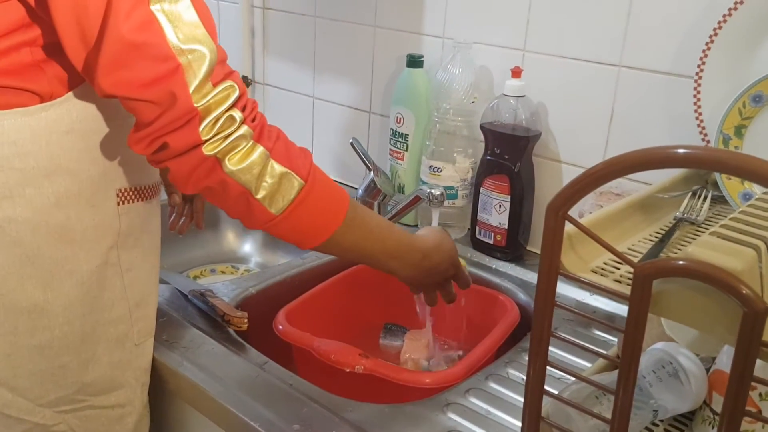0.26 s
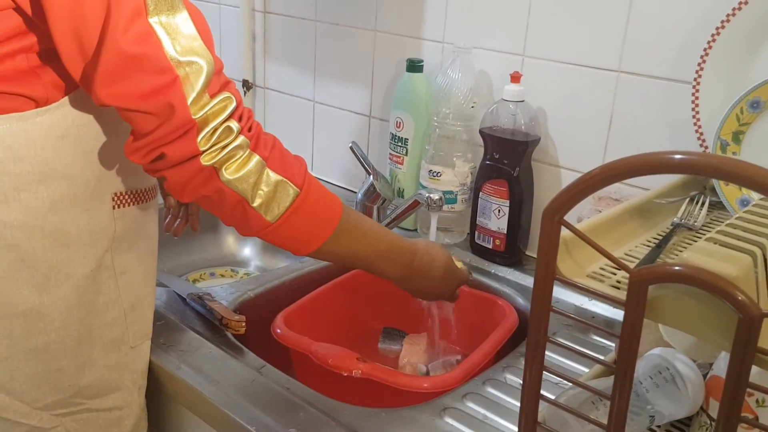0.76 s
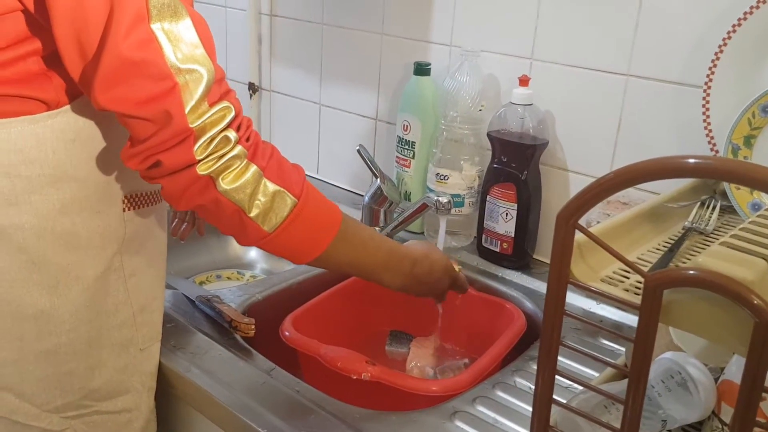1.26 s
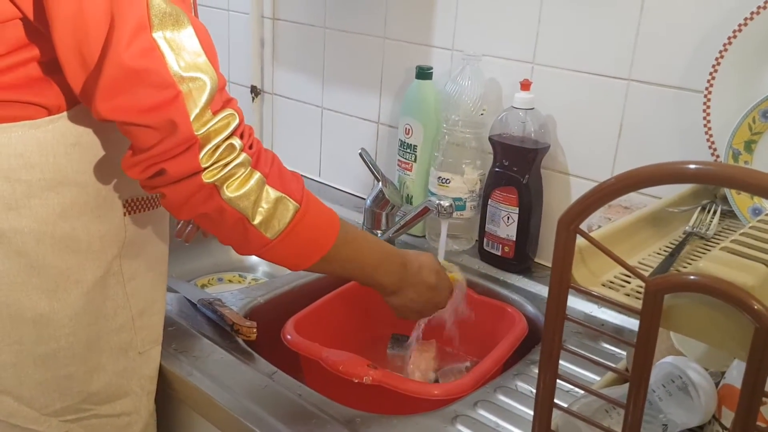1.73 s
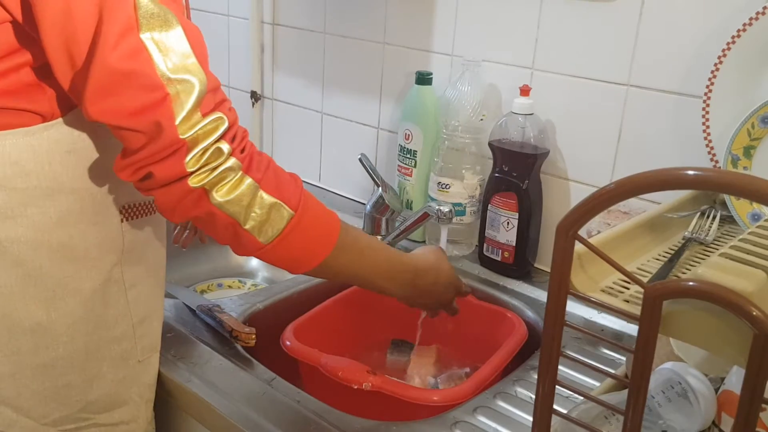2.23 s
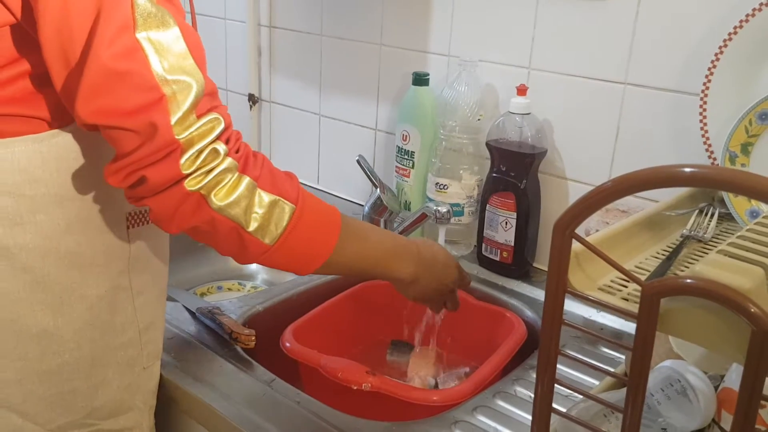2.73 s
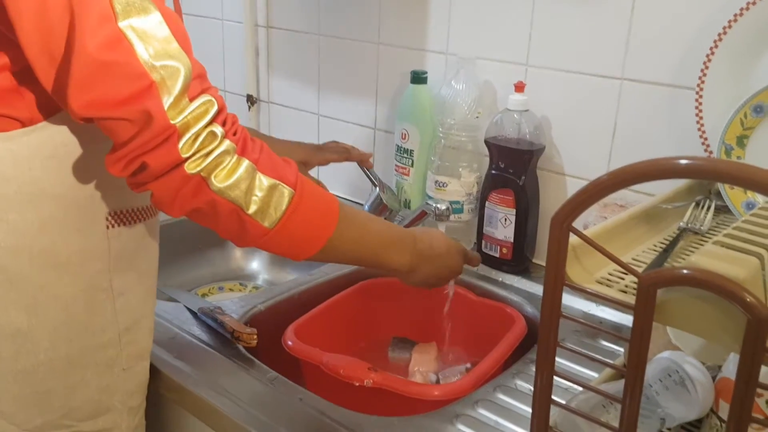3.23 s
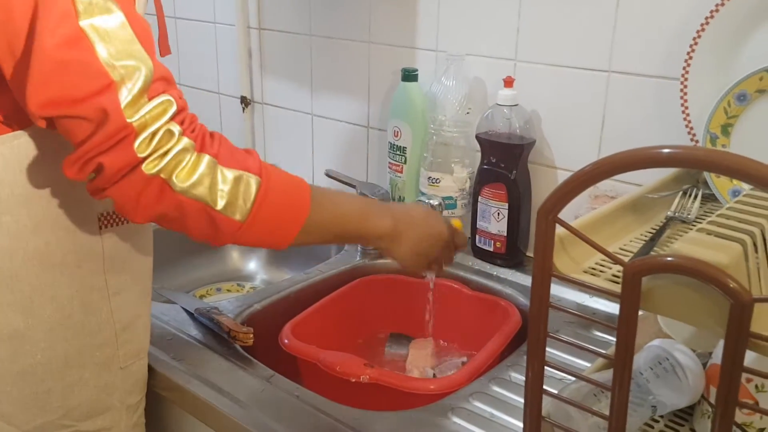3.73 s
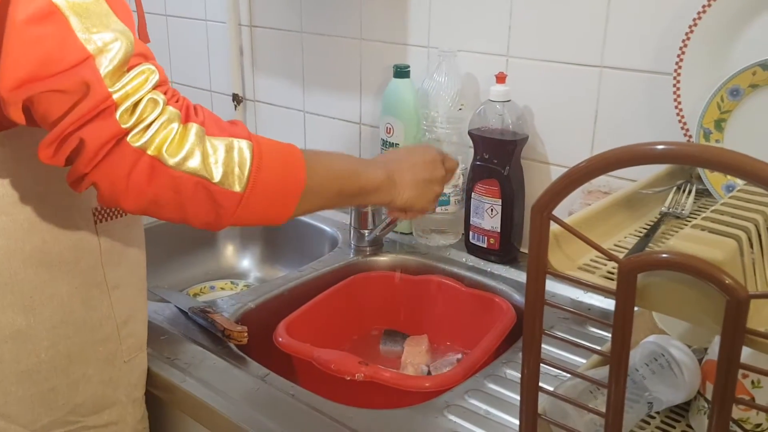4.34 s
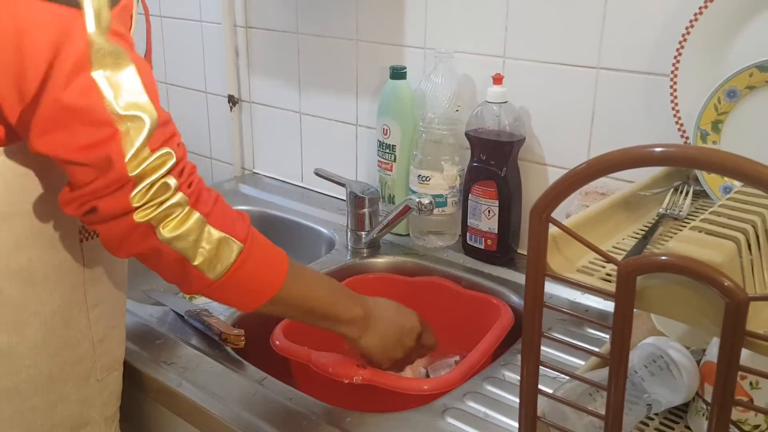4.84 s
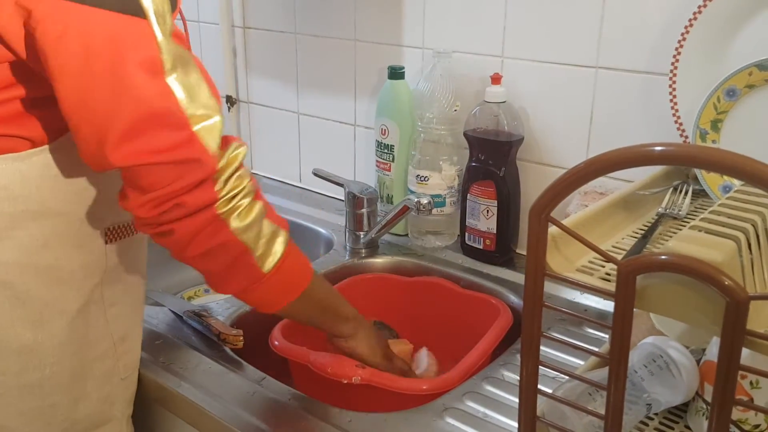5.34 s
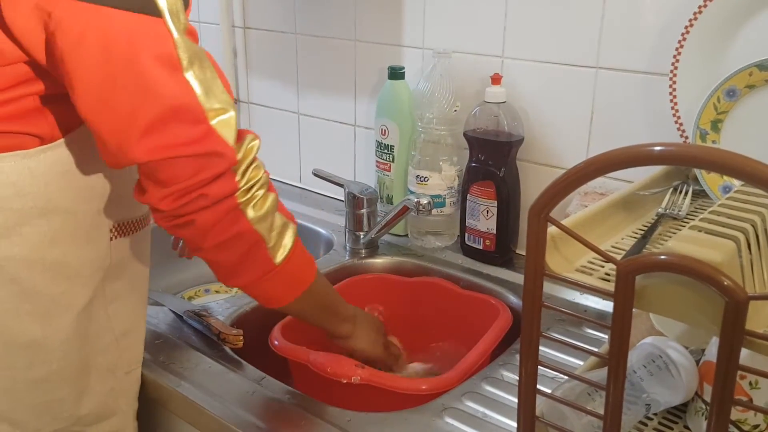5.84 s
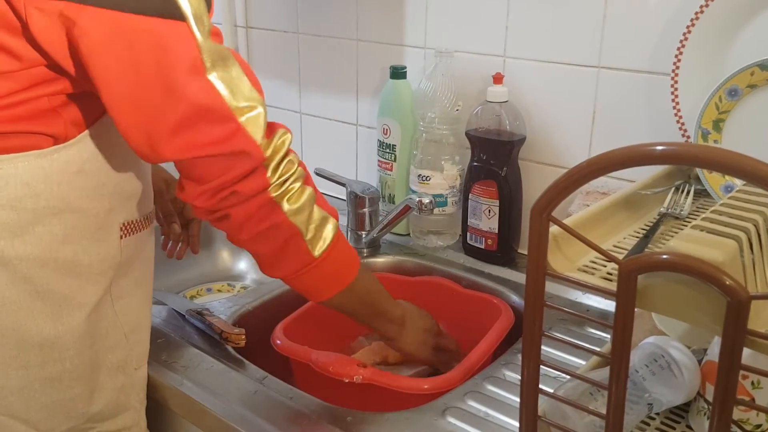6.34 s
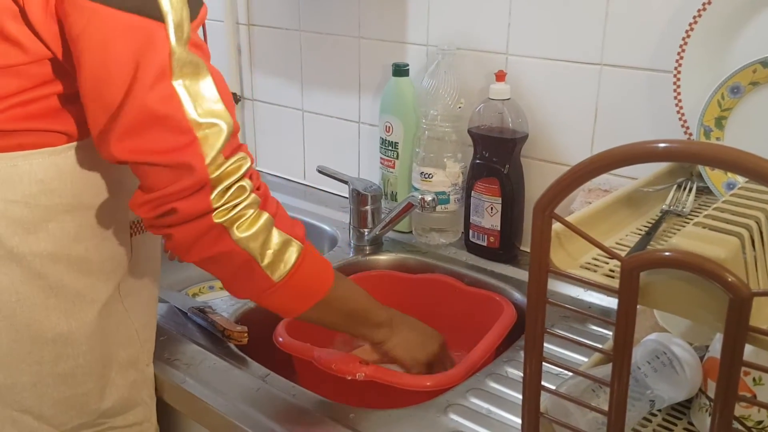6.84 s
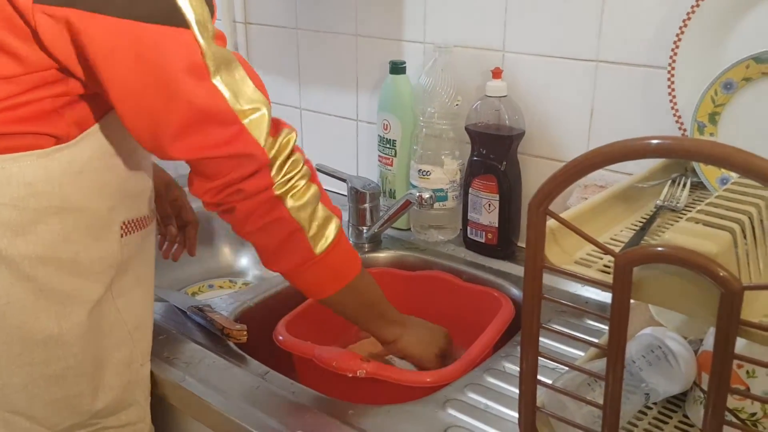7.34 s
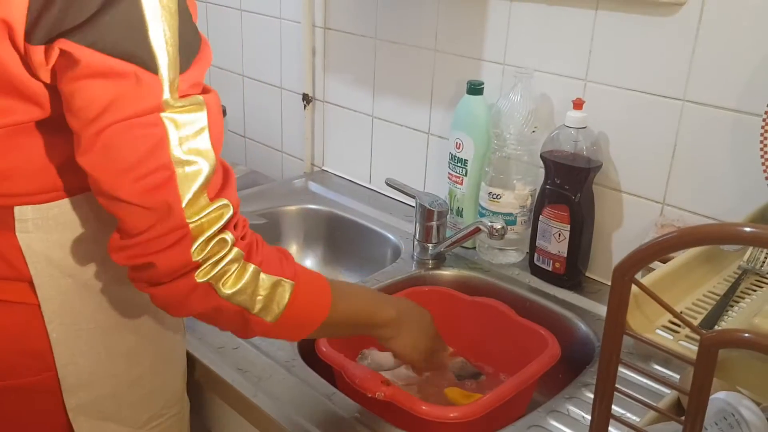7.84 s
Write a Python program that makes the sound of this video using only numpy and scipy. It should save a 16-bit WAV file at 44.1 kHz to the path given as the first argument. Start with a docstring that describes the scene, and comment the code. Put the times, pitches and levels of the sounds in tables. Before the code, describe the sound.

Close in a small tiled kitchen, a tap hisses brightly and patters into a plastic basin, with occasional hollow knocks against the steel sink. About three and a half seconds in, the tap shuts with a clunk and the water quickly stops. A hand then sloshes fish in shallow water, with bubbles, squirts and bumps, over a faint low motor hum.

```python
"""Tap, fish and basin in a steel sink

A kitchen tap hisses over a hand and some fish into a plastic basin in a steel sink, in a small tiled room.
Filtered noise and random impacts make the jet and its patter; resonant modes make the sink boom under the
basin's knocks and scrapes. The tap is shut, water runs off, and the hand sloshes the fish about in shallow
water: swarms of decaying sines are the bubbles, short noise bursts the splashes and squirts.
"""
import sys
import numpy as np
from scipy import signal
from scipy.fft import rfft, irfft, next_fast_len
from scipy.io import wavfile

SR = 44100
rng = np.random.default_rng(int(sys.argv[2]) if len(sys.argv) > 2 else 0)


def put_to_file(sound):
    """Save the sound as 16-bit audio at rate SR, in the file named by the first command-line argument."""
    columns = np.atleast_2d(sound).T  # one column per channel
    safe = np.clip(columns, -1, 1)
    whole_steps = np.round(safe * 32767)
    wavfile.write(sys.argv[1], SR, whole_steps.astype(np.int16))


N = 356261
TIME = np.arange(N) / SR
SHORT = TIME[:SR * 4 // 5]  # time axis of a single event, 0.8 s

# Bubbles that stand out singly, low and high, each with a small splash.
# Each row: start in seconds, relative level in dB, starting pitch in Hz.
BUBBLE_EVENTS = [(2.813, -31.5, 6950), (4.111, -55, 2360), (5.269, -47.5, 1047), (5.496, -42.5, 2275),
                 (5.64, -41.5, 1980), (5.864, -37, 1174), (5.92, -38, 3150), (6.044, -41.5, 976),
                 (6.226, -38.5, 1430), (6.255, -39, 630), (6.447, -42, 1430), (7.055, -19.5, 650),
                 (7.547, -25, 2320), (7.919, -41.5, 1770), (8.013, -50, 4140)]


def undb(db):
    """Decibels to amplitude gain: 20 dB is a factor of ten."""
    return 10 ** (np.asarray(db) / 20)


def unit(x):
    """Normalise the power: scale to rms 1."""
    return x / np.sqrt(np.mean(x ** 2) + 1e-20)


def fade(t, t60):
    """Exponential damping that loses 60 dB in t60 seconds."""
    return np.exp(-np.log(1000) * t / np.maximum(t60, 1e-3))


def swell(t, rise_s):
    """A rounded attack: exponential approach to full amplitude."""
    return 1 - np.exp(-t / rise_s)


def lookup(points, hz):
    """Interpolate (Hz, value) points on a logarithmic frequency axis."""
    f, value = np.transpose(points)
    return np.interp(np.log(hz + 0.0014), np.log(f), value)


def bins(x):
    """Frequencies of the discrete spectrum of x, in Hz."""
    return np.fft.rfftfreq(next_fast_len(x.shape[-1]), 1 / SR)


def shape(x, gain):
    """Linear filtering: multiply the spectrum by one gain for each frequency."""
    size = next_fast_len(x.shape[-1])
    return irfft(rfft(x, size) * gain, size)[..., :x.shape[-1]]


def colour(x, points):
    """Spectral shaping by (Hz, dB) points, with a roll-off below the first; rms 1."""
    f = bins(x)
    roll_off = np.minimum(f / points[0][0], 1) ** 2
    return unit(shape(x, undb(lookup(points, f)) * roll_off))


def add(track, s, sound):
    """Superposition: mix a sound into a track at time s."""
    start = min(max(int(s * SR), 0), N - 1)
    track[..., start:start + sound.shape[-1]] += sound[..., :N - start]


def waver(rate_hz):
    """Slow random modulation: low-passed noise with spread 1."""
    points = [(rate_hz / 10, 0), (rate_hz, -3), (rate_hz * 2, -20), (rate_hz * 20, -120)]
    return colour(rng.standard_normal(N), points)


def clicks(rate, scatter_db, size=N):
    """Shot noise: tiny random impacts at a mean rate per second, a few much stronger than the rest."""
    strength = undb(max(scatter_db, 0) * np.minimum(rng.exponential(size=size), 5))
    struck = rng.random(size) < rate / SR
    return unit(struck * strength * rng.choice([-1, 1], size))


def gestures(table, rise, fall, settle=1.43):
    """Amplitude envelope of hand movements: each gathers smoothly to its peak, then dies away ever faster."""
    power = np.zeros(N)
    for s, db, length in table:
        t = (TIME - s) / length
        loss = np.where(t < 0, (t / rise) ** 2, np.abs(t / fall) ** settle)
        power += (undb(db) * np.exp(-np.minimum(loss, 20))) ** 2
    return np.sqrt(power)


def room(x, wet_db, wide_hz=600, wander_hz=9, count=4):
    """Reverberation of tiled walls: both channels share the bass but each has its own treble."""
    # Each row: frequency in Hz, reverberation time in seconds.
    room_t60 = [(100, 0.49), (500, 0.35), (2500, 0.31), (6000, 0.27), (15000, 0.22)]
    f = bins(SHORT)
    apart = np.minimum(f / wide_hz, 1)
    centres = np.geomspace(60, 16000, 7)
    wet = 0
    for k in range(count):
        mid, side = rng.standard_normal((2, len(SHORT)))
        common = shape(mid, np.sqrt(1 - apart ** 2 / 2))
        noise = common + shape(side, apart / np.sqrt(2)) * np.array([[1], [-1]])
        tail = 0
        for hz, pick in zip(centres, np.eye(len(centres))):
            band = shape(noise, lookup(np.c_[centres, pick], f))  # overlapping bands that sum to one
            tail = tail + band * fade(SHORT, lookup(room_t60, hz))
        response = unit(tail * swell(SHORT, rise_s=0.00022))
        # the source wanders between spots, each with its own pattern of reflections; at 0 Hz it stays put
        phase = 2 * np.pi * wander_hz * (1 + k // 2) * TIME + k * np.pi / 2
        share = np.sqrt(2 / count) * np.cos(phase)
        wet = wet + signal.oaconvolve((x * share)[None], response, axes=1)[:, :N]
    return (x + undb(wet_db) * wet / np.sqrt(len(SHORT))) / np.hypot(1, undb(wet_db))


def kitchen():
    """Ambient noise, coherent between channels in the bass, and a motor's low tones with drifting phase."""
    # A motor humming in the kitchen. Each row: frequency in Hz, rms level in dB.
    hum_tones = [(59.2, -54), (113.0, -57.5), (172.3, -62)]
    # Spectrum of the background noise: strong bass, almost nothing near 3500 Hz, faint hiss above.
    # Each row: frequency in Hz, relative level in dB.
    background_colour = [(25, -7), (55, 7.5), (125, -3.5), (300, -13.5), (550, -20.5), (1200, -37.5),
                         (3500, -75), (8000, -38.5), (15000, -46)]
    hum = 0
    for hz, db in hum_tones:
        phase = 2 * np.pi * hz * TIME + 0.38 * waver(rate_hz=1.2)
        hum = hum + np.sqrt(2) * undb(db) * np.sin(phase)
    mid, side = colour(rng.standard_normal((2, N)), background_colour)
    side = shape(side, np.minimum(bins(side) / 500, 1))
    background_db = -54
    return hum + undb(background_db) * (mid + side * np.array([[1], [-1]]))


def radiate(x):
    """Radiation cut-off: the sink is too small to radiate below its lowest mode."""
    return signal.sosfilt(signal.butter(6, 55, "high", fs=SR, output="sos"), x)


def boom(centre_hz, focus_db, ring, rise_s=0.0011, apart=0.26):
    """Modal synthesis: one push rings the sink, and the contact point favours modes near some centre."""
    # Modes of the loaded sink. Each row: frequency in Hz, relative level in dB,
    # 60 dB decay time in seconds before scaling by ring.
    sink_modes = [(60.5, -0.5, 0.9), (74.8, 2.5, 0.42), (128.4, 4.5, 0.26), (146.6, 2, 0.39),
                  (177.7, 1.5, 0.28), (196.2, -10.5, 0.38), (226.7, 2, 0.33), (259.5, 0, 0.5),
                  (286.6, 0.5, 0.37), (334.8, -4.5, 0.25), (350.2, -5.5, 0.25), (382, -6.5, 0.29),
                  (463.5, -13, 0.29), (546, -12.5, 0.17), (608, -5.5, 0.17), (824, -13.5, 0.26),
                  (874, -8.5, 0.14), (954, -17, 0.19)]
    hz, db, t60 = np.transpose(sink_modes)[:, :, None]
    load, spot, phase, path = rng.uniform(-1.085, 1, (4, len(sink_modes), 1))
    off_centre_db = np.minimum(focus_db * np.log2(hz / centre_hz) ** 2, 26)
    weight = undb(db + 2.6 * spot - off_centre_db)
    t = SHORT[:SR // 3]
    # the shifting water detunes the modes a little from blow to blow
    turns = hz * (1 + 0.01 * load) * t + phase / 2
    modes = weight * np.exp(2j * np.pi * turns) * fade(t, t60 * ring)
    # standing waves put the higher modes out of step in the two channels
    shift = apart * np.sign(path) * np.minimum(hz / 140, 1) ** 3
    channels = np.exp(1j * shift * np.array([1, -1]))
    out = (channels.T @ modes).imag * swell(t, rise_s)
    return out / out[:, :SR // 20].std()


def rumble(rate, centre_hz, focus_db, ring):
    """Sustained modal excitation: many small pushes of uneven strength keep the sink ringing."""
    pushes = clicks(rate, scatter_db=3)
    ringing = signal.oaconvolve(pushes[None], boom(centre_hz, focus_db, ring), axes=1)[:, :N]
    return unit(radiate(ringing))


def crack(edge_hz, t60=0.054, treble_floor=0.078, snap_db=-4.0, snap_t60=0.0091):
    """Impact spectrum: hard plastic snaps on steel and chatters; a softer contact has less treble."""
    # Spectrum of the chatter. Each row: frequency in Hz, relative level in dB.
    crack_colour = [(80, -21), (200, 18), (450, 15), (680, 0.5), (860, 12), (1300, -2), (2000, 3.5),
                    (2600, 5), (3200, -1), (5000, 0), (8000, -17), (15000, -33)]
    t = SHORT[:SR // 5]
    chatter = colour(clicks(rate=6000, scatter_db=0, size=len(t)), crack_colour)
    low_pass = treble_floor + 1 / np.hypot(1, (bins(chatter) / edge_hz) ** 1.47)
    out = shape(chatter, low_pass) * fade(t, t60) * swell(t, rise_s=0.00048)
    snap = colour(rng.standard_normal(len(t)), [(3000, -4.5), (5000, 0.5), (9000, -4.5), (15000, -9.5)])
    return out / out[:SR // 20].std() + undb(snap_db) * snap * fade(t, snap_t60)


def contacts(s, db, crack_db, edge_hz, tip_s, loss_db, count=3):
    """Impact sequence with energy loss: one side hits, the other drops, then the basin rocks to rest.

    Returns rows of start in seconds, boom in dB, crack in dB, crack edge in Hz."""
    equal_tip_s = 0.02  # after tipping this long, the other side's boom is as strong as the first
    rock_s, rock_shrink = 0.078, 0.71  # first rock in seconds; each takes this share of the one before
    # later contacts are softer: less crack, and a lower edge
    soft_db, soft_hz = crack_db - 5.5, edge_hz * 0.6
    drop_db = 20 * np.log10(max(tip_s / equal_tip_s, 1e-3))
    rows = [(s, db, crack_db, edge_hz), (s + tip_s, db + drop_db, soft_db + drop_db, soft_hz)]
    uneven = 1 + 0.06 * rng.standard_normal(count)
    rocks = s + tip_s + np.cumsum(rock_s * rock_shrink ** np.arange(count) * uneven)
    for k, when in enumerate(rocks, 1):
        rows.append((when, db - k * loss_db, soft_db - k * loss_db, soft_hz))
    return rows


def basin():
    """Impact and stick-slip excitation by the basin: returns the sink's boom and the contact cracks."""
    # Knocks of basin on sink. Each row: start in seconds, relative boom level in dB, boom centre in Hz,
    # focus in dB lost one octave from the centre, relative crack level in dB, upper edge of the first crack
    # in Hz, time until the other side lands in seconds, loss from one rock to the next in dB.
    knocks = [(0.017, -33.5, 62.6, 12, -69, 5000, 0.0083, 18),
              (0.153, -28, 260, 0.5, -35.5, 2120, 0.0089, 11),
              (0.777, -37.5, 207, 18, -41, 2000, 0.0087, 9), (0.857, -28, 130, 0.5, -34.5, 920, 0.0085, 11),
              (1.631, -28.5, 280, 18, -30, 2540, 0.0053, 17), (1.711, -11.5, 380, 0.8, -15, 1070, 0.016, 7),
              (3.338, -12, 166, 1.5, -17, 3300, 0.035, 5.5),
              (3.495, -18.5, 110, 4.5, -36, 1820, 0.0098, 9.5),
              (3.872, -19, 269, 39, -31.5, 1650, 0.0062, 10.5), (3.94, -24, 240, 2, -37.5, 1440, 0.006, 11),
              (4.216, -30.5, 210, 5.5, -40, 1740, 0.029, 14.5),
              (4.318, -13, 223, 2.5, -16.5, 4600, 0.022, 23), (4.661, -36, 204, 48, -53.5, 3500, 0.0036, 9),
              (4.861, -24.5, 215, 17, -36.5, 2320, 0.023, 10),
              (5.422, -38, 194, 49, -53.5, 595, 0.0095, 14), (6.636, -30, 127, 3, -47, 805, 0.011, 2),
              (6.701, -29, 221, 33, -44.5, 4500, 0.006, 11), (6.828, -24, 170, 16, -40, 1860, 0.0081, 11),
              (7.152, -30, 123, 1.5, -49.5, 3000, 0.0058, 15),
              (7.263, -32.5, 157, 21, -43.5, 2400, 0.0065, 8),
              (7.394, -10.5, 183, 12, -18.5, 3740, 0.013, 24),
              (7.732, -32.5, 69.4, 1.5, -50, 2600, 0.0041, 6.5),
              (7.804, -25, 187, 16, -38, 4360, 0.0062, 17.5), (8.072, -27.5, 184, 7, -40, 3000, 0.006, 8)]
    # Shoves that drag the basin over the sink.
    # Each row: peak time in seconds, relative level in dB, length in seconds before the shares below.
    shoves = [(0.02, -39.5, 0.43), (0.88, -40, 0.19), (1.7, -21.5, 0.12), (3.56, -32.5, 0.14),
              (4.0, -32, 0.035), (4.75, -34, 0.14), (4.98, -40, 0.075), (6.72, -31.5, 0.07),
              (6.88, -34, 0.15), (7.35, -23.5, 0.1), (7.59, -24, 0.084)]
    booms, cracks = np.zeros((2, N)), np.zeros(N)
    for start, blow_db, centre_hz, focus_db, hard_db, hard_hz, tip_s, loss_db in knocks:
        for s, db, crack_db, edge_hz in contacts(start, blow_db, hard_db, hard_hz, tip_s, loss_db):
            # ring is a share of the sink's own ring time
            add(booms, s, undb(db) * boom(centre_hz, focus_db, ring=0.84))
            add(cracks, s, undb(crack_db) * crack(edge_hz))
    # times to get going and to stop, as shares of the length
    shoving = gestures(shoves, rise=0.72, fall=0.91)
    drag = rumble(rate=140, centre_hz=204, focus_db=0.45, ring=0.74) * shoving
    return undb(-2.5) * radiate(booms) + undb(-3.5) * drag, cracks


def bubble(hz, t60, rise):
    """Volume resonance of an air pocket: quick attack, damping, and a pitch that climbs near the surface."""
    t = SHORT[:int(max(t60, .002) * SR)]
    cycles = hz * (t + rise * t ** 2 / (2 * t60))
    return np.sin(2 * np.pi * cycles) * fade(t, t60) * swell(t, 1 / hz)


def fizz(low_hz, high_hz, cycles, scatter_db, count):
    """A swarm of bubbles of all sizes: equal cycles of decay, so small ones die sooner."""
    out = np.zeros(N)
    for when, size, strength in rng.random((count, 3)):
        hz = low_hz * (min(high_hz, SR / 3) / low_hz) ** size
        gain = undb(-scatter_db * np.log(strength + .02))
        add(out, when * N / SR, gain * bubble(hz, cycles / hz, rise=0.36))
    return unit(out)


def plinks():
    """Resonance of the single bubbles: the lower the pitch, the longer the ring."""
    out = np.zeros(N)
    for s, db, hz in BUBBLE_EVENTS:
        t60 = 0.064 * (1500 / hz) ** 0.45  # 0.064 s at 1500 Hz
        add(out, s, undb(db) * bubble(hz, t60, rise=0.07))
    return out


def splash(centre_hz, t60, width_db=6.0):
    """Band-limited shot noise: a quick scatter of drops on shallow water."""
    drops = clicks(rate=1900, scatter_db=4.5, size=len(SHORT))
    octaves = np.log2((bins(drops) + 1) / centre_hz)
    band = unit(shape(drops, undb(-width_db * octaves ** 2)))
    return band * fade(SHORT, t60) * swell(SHORT, t60 * 0.029)


def slosh():
    """Air entrainment and drop impacts: stirred water folds in air and throws drops, in small surges."""
    # Spectrum of the stirred water. Each row: frequency in Hz, relative level in dB.
    slosh_colour = [(300, 16.5), (600, -3), (1100, 0), (2200, 6), (3300, 0.5), (5200, 1), (8000, -10),
                    (12000, -7), (16000, -12)]
    # Strokes of the hand through the water, and water running off it.
    # Each row: peak time in seconds, relative level in dB, length in seconds before the shares below.
    strokes = [(3.55, -38.5, 0.087), (4.05, -52.5, 0.3), (4.27, -53.5, 0.56), (4.74, -46.5, 0.18),
               (5.35, -50, 0.13), (5.62, -56, 0.22), (5.94, -50, 0.19), (6.11, -48.5, 0.28),
               (6.48, -47, 0.23), (6.71, -42.5, 0.17), (6.97, -52.5, 0.75), (7.34, -41, 0.21),
               (7.61, -43.5, 0.3), (8.06, -52.5, 0.22)]
    # Slaps of water, each a handful of drops.
    # Each row: start in seconds, relative level in dB, centre in Hz, 60 dB decay time in seconds.
    slaps = [(0.547, -38.5, 910, 0.15), (3.244, -36, 935, 0.072), (4.189, -47, 800, 0.13),
             (5.603, -39, 2030, 0.042), (6.002, -30.5, 1380, 0.028), (6.538, -46.5, 1840, 0.26),
             (7.522, -34, 2300, 0.053)]
    # Water squirting between fingers and fish. Each row: start in seconds, relative level in dB.
    squirts = [(4.794, -23), (4.8084, -28), (5.317, -36), (5.3537, -34), (5.5827, -36), (6.132, -34),
               (6.445, -34.5), (6.539, -29), (7.5624, -23), (7.786, -29)]
    folds = fizz(585, 6500, cycles=25, scatter_db=5, count=2000)
    drops = clicks(rate=900, scatter_db=2.5)
    water = colour(folds + undb(4) * drops, slosh_colour)
    surging = unit(water * undb(2.2 * waver(rate_hz=17)))
    # times to gather and to calm, as shares of the length
    out = surging * gestures(strokes, rise=0.61, fall=0.72)
    for s, db, hz in BUBBLE_EVENTS:
        # the splash grows more slowly than its bubble
        add(out, s, undb(-18 + 0.68 * db) * splash(hz, t60=0.088))
    for s, db, centre_hz, t60 in slaps:
        add(out, s, undb(db + 2.0) * splash(centre_hz, t60))
    for s, db in squirts:
        spray = colour(rng.standard_normal(len(SHORT)), [(4000, -12.5), (8500, -14), (12000, 1.0), (16000, -5.5)])
        add(out, s, undb(db - 2.0) * spray * fade(SHORT, t60=0.02) * swell(SHORT, rise_s=0.0029))
    return out


def diffuse(grains, wet_db):
    """Diffuse field: countless drops at ever new spots reach the two channels as unrelated washes."""
    return unit(grains + undb(wet_db) * rng.standard_normal((2, N)))


def tap():
    """Jet noise and drop impacts: the aerated jet hisses, and patter, foam and a faint drumming mark its landing."""
    # Running tap, louder while the hand breaks up the jet. Each row: time in seconds, relative level in dB.
    flow_points = [(0.0, -43.5), (0.7, -42.5), (1.07, -37), (1.7, -38), (1.95, -42), (2.73, -42),
                   (3.4, -42)]
    # Spectra of the hiss and of the patter. Each row: frequency in Hz, relative level in dB.
    jet_colour = [(5000, -35), (8000, -13), (10500, 0), (12500, 1.5), (14500, -0.5), (16000, -7)]
    patter_colour = [(150, -25), (300, 0.5), (600, -9), (1300, -12), (2000, -5.5), (3000, -2.5),
                     (3700, 3.5), (5200, 1.5), (7000, -1), (9000, -8), (15000, -8.5)]
    shut_s = 3.452  # the lever closes
    jet_fall, patter_fall = 152, 62  # dB per second: the hiss stops first, the falling water after it
    jet = colour(diffuse(clicks(rate=4300, scatter_db=11.0), wet_db=26.5), jet_colour)
    foam = fizz(1550, 7900, cycles=4.6, scatter_db=8.0, count=4000)
    grains = unit(clicks(rate=3000, scatter_db=6.5) + undb(-10.5) * foam)
    patter = colour(diffuse(grains, wet_db=10.0), patter_colour)
    drum = rumble(rate=1800, centre_hz=82.7, focus_db=3.5, ring=0.6)
    landing = patter + undb(-9) * drum
    flutter = undb(0.91 * waver(rate_hz=7.7))  # the stream wobbles on the fingers
    flow_db = np.interp(TIME, *np.transpose(flow_points))
    since_shut = np.maximum(TIME - shut_s, 0)
    jet = jet * undb(2.0 + flow_db - jet_fall * since_shut)
    # the patter follows the jet's level only in part
    landing = landing * undb(-12 + 0.7 * flow_db - patter_fall * since_shut)
    left_db = 1.2
    return (jet + landing) * flutter * undb([[left_db], [-left_db]])


def scene():
    """Superposition of all sources: those in the sink lie a little to the left by level difference."""
    booms, cracks = basin()
    water = room(slosh(), wet_db=8.0) + room(plinks(), wet_db=-4.5, wander_hz=0)
    near = water + room(cracks, wet_db=5, wide_hz=710) + booms
    left_db = 1.0
    return tap() + near * undb([[left_db], [-left_db]]) + kitchen()


def record(dry):
    """Band limiting and overload: a high-pass drops the rumble, full scale clips, a low-pass cuts the top."""
    sound = signal.sosfilt(signal.butter(2, 35, "high", fs=SR, output="sos"), dry)
    top_hz = 15900
    low_pass = signal.ellip(10, .2, 80, top_hz, fs=SR, output="sos")
    return signal.sosfilt(low_pass, np.clip(sound, -1, 1))


dry = scene()
out = record(dry)
put_to_file(out)
```